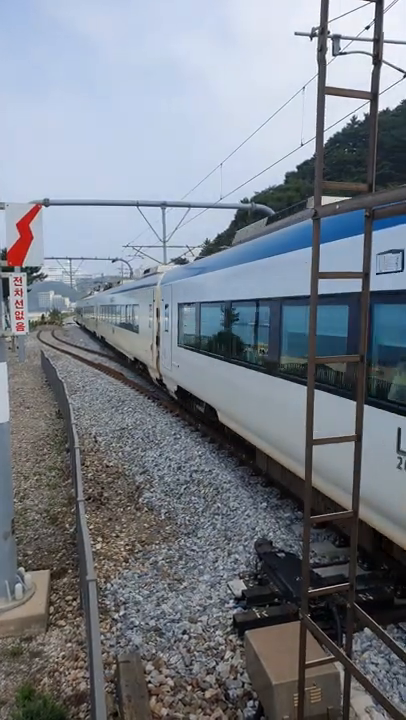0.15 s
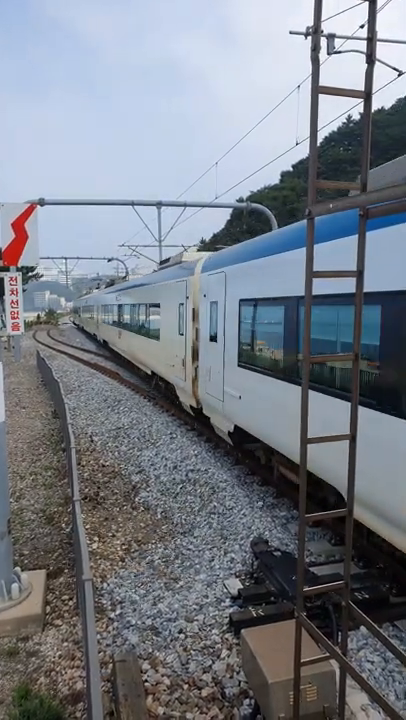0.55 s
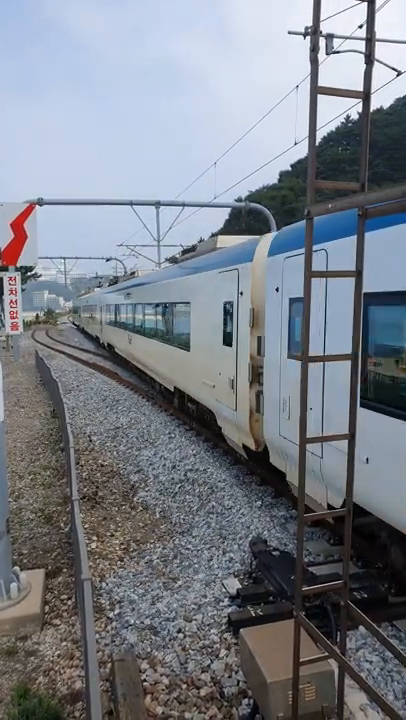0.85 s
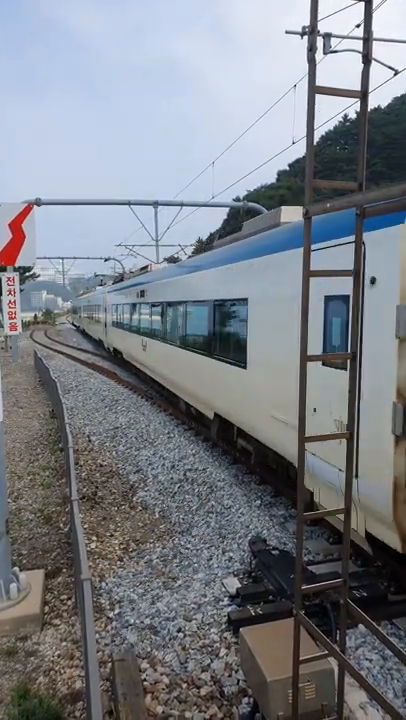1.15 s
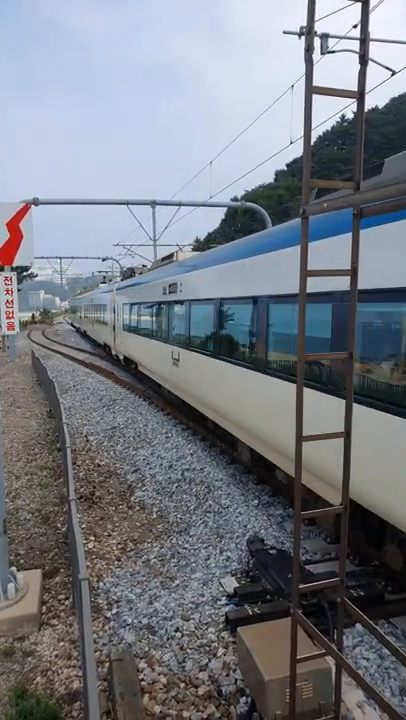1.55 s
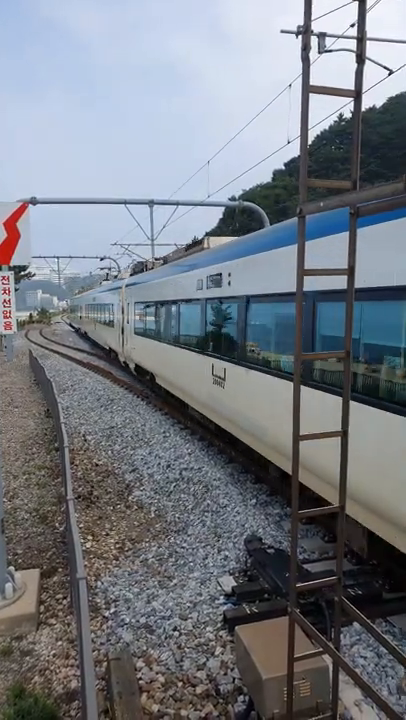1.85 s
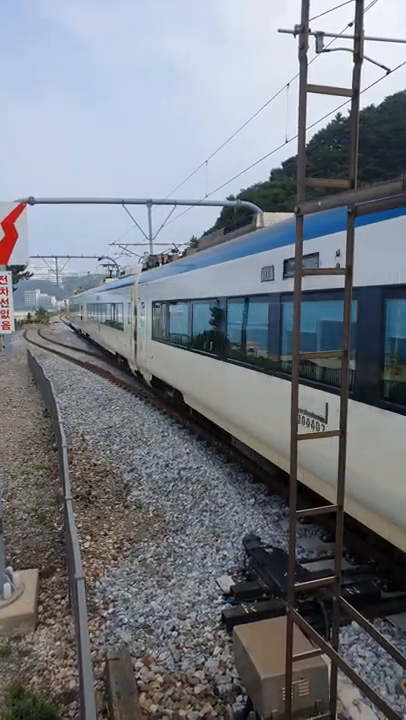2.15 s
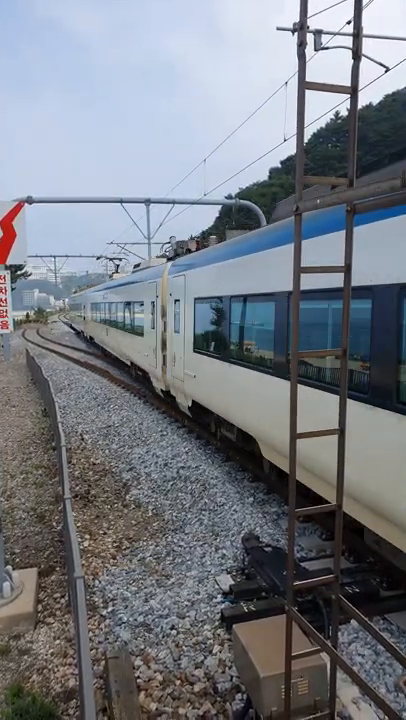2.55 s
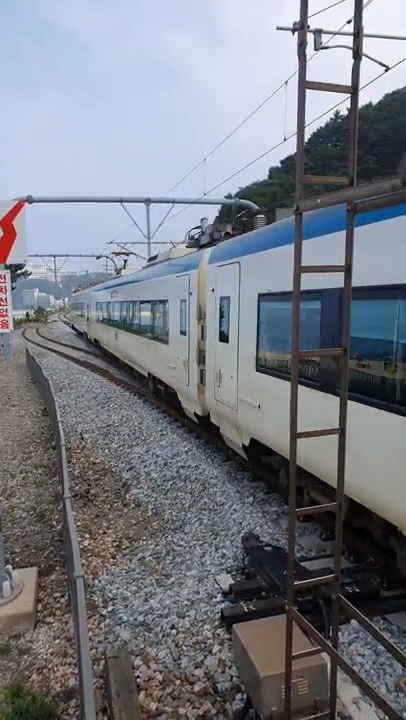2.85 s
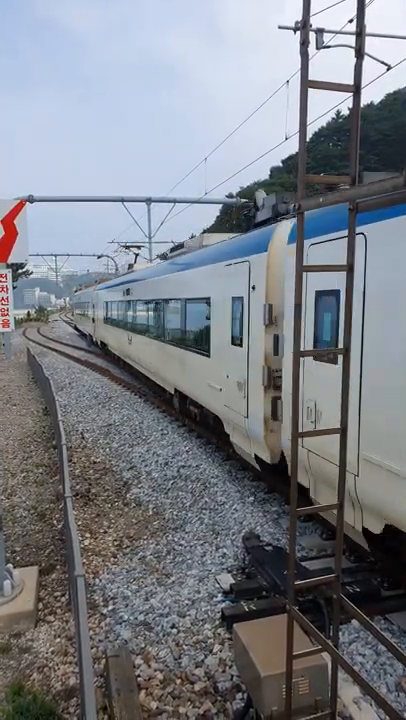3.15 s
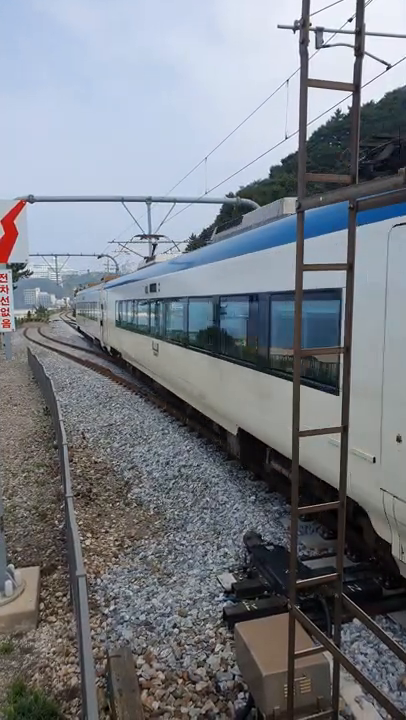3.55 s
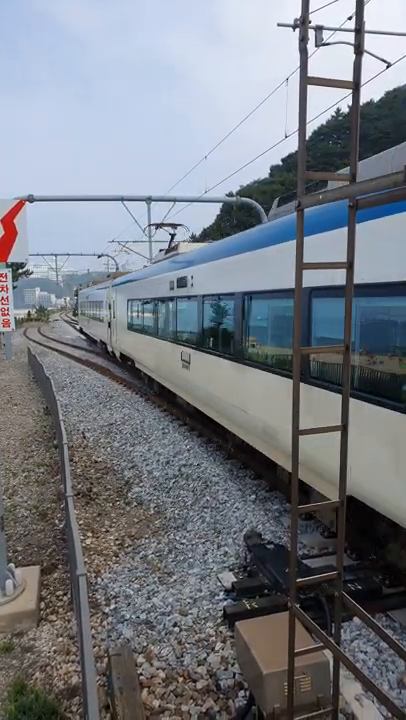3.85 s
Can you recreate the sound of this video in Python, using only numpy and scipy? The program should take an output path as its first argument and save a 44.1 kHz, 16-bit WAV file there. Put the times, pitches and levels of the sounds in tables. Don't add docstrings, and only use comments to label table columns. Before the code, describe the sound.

Close trackside view of a passing train: soft rolling hum swells into heavy clunks over rail joints, eases briefly, then returns with sharp clanking, hissing wheel strikes and scraping that ring away.

```python
import sys
import numpy as np
from scipy import signal
from scipy.fft import rfft, irfft
from scipy.io import wavfile

SR = 44100
rng = np.random.default_rng(int(sys.argv[2]) if len(sys.argv) > 2 else 0)


def wav_out(sig):
    wavfile.write(sys.argv[1], SR, np.round(np.clip(np.atleast_2d(sig).T, -1, 1) * 32767).astype(np.int16))


def natural_amplitude(level_db):
    exponent = np.asarray(level_db, float) / 20
    return 10 ** exponent


N = 176400
HZ = np.fft.rfftfreq(N, 1 / SR)
T = np.arange(N) / SR
HIT_N = 8192
LEFT_LAG_S = .00022

# [t/s, sleeper hum level/dB, rail song level/dB, rail song f/Hz,
# flange grind level/dB, rim tone level/dB]
BOGIES = [(0, -40, -37.5, 480, -44, -66), (.44, -41, -34, 527, -48, -85),
          (.72, -29.5, -28.5, 508, -43.5, -44), (.85, -24.5, -24, 512, -39, -44),
          (1.04, -19.5, -21, 561, -34, -42), (1.16, -21.5, -30, 558, -35, -37),
          (1.53, -20.5, -24.5, 517, -37.5, -40.5), (1.77, -22.5, -32, 552, -43, -39),
          (1.98, -27, -26, 484, -44, -40.5), (2.19, -33, -35.5, 492, -43.5, -44),
          (2.52, -35, -39.5, 502, -44.5, -50), (2.72, -24.5, -28.5, 502, -43.5, -47.5),
          (2.88, -23.5, -27.5, 505, -41, -40.5), (3.06, -22, -20.5, 535, -38.5, -43),
          (3.25, -24, -38.5, 534, -46.5, -44.5), (3.6, -22, -25, 508, -42, -41),
          (4, -25.5, -44.5, 520, -41, -43.5)]
# [t/s, peak level/dB, knock f/Hz, rattle level over the thump/dB]
AXLES = [(0.237, -13, 173, -18), (0.46, -11.5, 203, -10), (0.882, -13, 175, -33), (0.912, -2.5, 253, -14),
         (1.089, -6.5, 195, -10), (1.111, -0.5, 196.4, -13.5), (1.138, -4, 234, -13), (1.239, -8, 208, -26),
         (1.34, 1.5, 470.4, -17), (1.557, -8, 227, -40), (1.608, -2, 175, -12.5), (1.81, -17.5, 178, 4),
         (1.847, -10.5, 208, -3.5), (1.906, -6, 173, -7.5), (2.049, -8, 432, -7), (2.386, -7.5, 281, -14),
         (2.598, -12.5, 194, -12), (2.628, -8.5, 292, -8), (2.88, -13, 495, -22), (3.137, -7.5, 333, -5),
         (3.35, -13.5, 257, -3.5), (3.383, -9, 322, -7.5), (3.592, -8, 465, -10.5), (3.838, -14, 221, -38),
         (3.896, -3.5, 233, -14), (3.967, -12, 187, -8)]
# [t/s, peak level/dB, f/Hz]
RAIL_PINGS = [(0.583, -17, 486), (0.657, -10, 488), (0.763, -30, 510), (0.861, -8.5, 500),
              (0.891, -5.5, 546), (0.974, -15, 523), (1.176, -6.5, 503), (1.249, -10, 440),
              (1.342, 0.5, 465), (1.495, -12, 475), (1.56, 1, 475.5), (1.66, -9, 581), (1.996, -22, 480),
              (2.05, -19, 413), (2.601, -13.5, 525), (2.752, -13, 476), (2.835, -7, 473),
              (2.884, -7.5, 509), (2.988, -13.5, 524), (3.098, -2, 464), (3.212, -11, 553),
              (3.504, -13, 502), (3.596, -19, 439), (3.85, -5.5, 458), (3.903, -6, 543)]
# [t/s, peak level/dB, f/Hz, length/s]
SLEEPER_BOOMS = [(0.236, -24, 184, 0.043), (0.456, -16.5, 194, 0.087), (0.923, -8.5, 289, 0.032),
                 (1.011, -22, 157, 0.044), (1.093, -5, 175, 0.038), (1.135, -2.5, 288, 0.034),
                 (1.181, -15, 268, 0.05), (1.238, -14, 203, 0.043), (1.281, -12, 241, 0.042),
                 (1.586, -14, 248, 0.033), (1.803, -20, 183, 0.04), (1.907, -8, 175, 0.061),
                 (2.39, -7.5, 160.4, 0.061), (2.631, -4.5, 168, 0.058), (3.149, -2.5, 169, 0.035),
                 (3.368, -5.5, 270, 0.043), (3.618, -11.5, 240, 0.029), (3.838, -7.5, 207, 0.061),
                 (3.883, -3, 207, 0.061), (3.964, -19, 188, 0.035)]
# [t/s, ring level/dB, clatter level/dB, rise/s, clatter t60/s]
FLANGE_STRIKES = [
    (.265, -55, -63, .01, 0.18),
    (0.976, -40, -27.5, 0.0077, 0.11),
    (1.596, -22, -36, .003, 0.23),
    (1.603, -39, -25, 0.0013, 0.067),
    (3.02, -26.5, -19, 0.0011, 0.11),
    (3.047, -21.5, -19.5, 0.0085, 0.47),
    (3.119, -22.5, -40, 0.002, 0.12),
    (3.352, -38.5, -35.5, .004, 0.26),
    (3.951, -45, -37, 0.011, 0.13),
]
# [t/s, level/dB]
BODY_LEVEL = [(0, -39), (.5, -40), (1.05, -28), (2.2, -28), (2.55, -33), (2.9, -32), (4, -29.5)]

# [f/Hz, width/Hz, level/dB]
RAIL_MODES = [(175, 138, -2), (225, 215, -3.5), (344, 66, -4), (707, 220, -21), (1380, 130, -24)]
# [f/Hz, level/dB]
RAIL_BED = [(60, -40), (120, -42), (400, -11), (750, -21), (1600, -59.5)]
# [f/Hz, width/Hz, level/dB]
RIM_MODES = [(1267, 89, 4), (2066, 65, 7.5), (2700, 240, -2), (3520, 105, 3.5), (4385, 320, -1),
             (4820, 104, -3.5), (5307, 390, -4.5), (6260, 300, -5.5)]
# [f/Hz, width/Hz, level/dB]
STRUCK_RIM_MODES = [(2820, 120, -10), (3290, 150, -6), (3570, 160, -6), (3900, 200, -11), (4390, 130, 0),
                    (4790, 110, -2), (5350, 200, 0), (5640, 90, -7), (6430, 150, -4), (6800, 250, -9)]
# [f/Hz, width/Hz, level/dB]
WHEEL_MODES = [
    [(9600, 300, -10), (11600, 200, -1), (12260, 350, 6.5), (12900, 300, -2), (14400, 400, 8),
     (15500, 200, 0)],
    [(8600, 330, -1), (9820, 180, -7), (11060, 350, -0.5), (11930, 250, 3.5), (12700, 200, 2),
     (12800, 250, -7), (13800, 300, 1), (15100, 300, -7)],
]
# [f/Hz, level/dB]
WHEEL_SHEEN = [
    [(7000, -7), (8500, -16), (10200, -16), (11500, -5.5), (14700, -8), (16000, -1.5)],
    [(7000, -6.5), (9300, -48), (10400, -9.5), (11200, -12), (14000, -16), (16000, -17)],
]
# [f/Hz, level/dB]
CLATTER_COLOUR = [(1800, -28), (2400, -20), (2750, -5), (3300, -3), (5000, -1), (6800, -5), (7800, -24)]
# [f/Hz, level/dB]
GRIND_COLOUR = [(1250, 6.5), (2450, 0), (3200, -3.5), (4200, -9), (6800, -11), (9200, -25), (11500, -21.5),
                (16000, -31)]
# [f/Hz, width/Hz, level/dB]
ROAR_MODES = [(3360, 1100, 2), (11400, 1100, -15)]
# [f/Hz, level/dB]
RATTLE_COLOUR = [(500, -1), (900, -1), (1500, -8.5), (2500, -15), (6500, -22.5), (8000, -37.5)]
# [f/Hz, level/dB]
BODY_COLOUR = [(20, -67), (40, -2.5), (80, -0.5), (105, 2.5), (150, -13.5)]
# [f/Hz, width/Hz, level/dB]
FLOOR_MODES = [(83.8, 9.5, 8)]

# [f/Hz, coherence/1]
COHERENCE = [(60, .99), (400, .96), (800, .9), (1500, .7), (3000, .45), (8000, .3), (15000, .2)]
# [f/Hz, level/dB]
LEAN = [(240, 0.5), (950, -1.5), (3000, 0.5), (6000, -6), (12000, -4.5)]
# [f/Hz, level/dB]
STRIKE_LEAN = [(3000, -3), (6000, -8), (12000, -9.5)]


def read(points, hz):
    f, value = np.transpose(points)
    return np.interp(np.log(hz + 1), np.log(f + 1), value)


def humps(peaks, hz):
    return np.sqrt(sum(natural_amplitude(2 * db) / (1 + (2 * (hz - f) / w) ** 2) ** 2 for f, w, db in peaks))


def noise(gain, lean):
    n = 2 * len(gain) - 2
    hz = np.fft.rfftfreq(n, 1 / SR)
    a, b = rfft(rng.standard_normal((2, n)), axis=1) * gain
    same = np.clip(read(COHERENCE, hz), 0, 1)
    side = natural_amplitude(read(lean, hz) / 2)
    left = a * side * np.exp(-2j * np.pi * hz * LEFT_LAG_S)
    right = (same * a + np.sqrt(1 - same ** 2) * b) / side
    x = irfft([left, right], axis=1)
    return x / x.mean(0).std()


def flicker(per_s, depth_db):
    x = irfft(rfft(rng.standard_normal(N)) / (1 + (HZ / per_s) ** 2), N)
    return natural_amplitude(depth_db * x / x.std())


def glide(x, hz, width):
    turn = np.exp(2j * np.pi * np.cumsum(hz) / SR)
    r = np.exp(-np.pi * width / SR)
    x = 2 * (turn * signal.lfilter([1.], [1, -2 * r, r * r], x / turn, axis=1)).real
    return x / x.mean(0).std()


def blow(s, rise, t60):
    t = np.maximum(T - s, 0)
    return np.minimum(t / abs(rise), 1) * natural_amplitude(-60 * t / t60)


def hit_times():
    t = np.arange(HIT_N) / SR
    return t, np.maximum(t - np.array([[LEFT_LAG_S], [0]]), 0)


def course(column):
    table = np.transpose(BOGIES)
    return np.interp(T, table[0], table[column])


def sleeper_hum():
    colour = np.hypot(humps(RAIL_MODES, HZ), natural_amplitude(read(RAIL_BED, HZ)))
    return noise(colour, LEAN) * flicker(per_s=8.3, depth_db=3.0) * natural_amplitude(course(1))


def rail_song():
    sing_hz = course(3)
    song = 0
    for ratio in (.92, 1.12):
        mode = glide(noise(np.ones(len(HZ)), LEAN), ratio * sing_hz, width=70)
        song = song + mode * flicker(per_s=6.3, depth_db=5.0) * 0.49
    return song * natural_amplitude(course(2) - 0.5)


def axle_joints():
    out = np.zeros((2, N + HIT_N))
    hz = np.fft.rfftfreq(HIT_N, 1 / SR)
    t, late = hit_times()
    rise = np.minimum(late / 0.008, 1)
    for s, peak_db, pitch_hz, rattle_db in AXLES:
        extra = humps([(520, 200, -3), (700, 160, -7), (pitch_hz, 110, 0)], hz)
        colour = np.sqrt(humps(RAIL_MODES, hz) ** 2 + extra ** 2)
        thump = noise(colour, LEAN) * rise * natural_amplitude(-11.5 - 60 * t / 0.28)
        partials = ((pitch_hz, 1), (1.43 * pitch_hz, .45), (640, .45))
        knock = sum(g * np.sin(2 * np.pi * (f * late + rng.random())) for f, g in partials)
        knock = knock * rise * natural_amplitude(-4 - 60 * t / 0.11)
        rattle = noise(natural_amplitude(read(RATTLE_COLOUR, hz)), LEAN) * np.minimum(t / .008, 1)
        rattle = rattle * natural_amplitude(-6 + rattle_db - 60 * t / 0.18)
        fade = 1 - (t / t[-1]) ** 2
        out[:, round(s * SR):][:, :HIT_N] += natural_amplitude(peak_db) * fade * (thump + knock + rattle)
    return out[:, :N]


def rail_pings():
    out = np.zeros((2, N + HIT_N))
    t, late = hit_times()
    for s, peak_db, pitch_hz in RAIL_PINGS:
        shape = np.minimum(late / 0.0096, 1) * natural_amplitude(peak_db - 10 - 60 * t / 0.24)
        out[:, round(s * SR):][:, :HIT_N] += shape * np.sin(2 * np.pi * pitch_hz * late)
    return out[:, :N]


def sleeper_booms():
    out = np.zeros((2, N + HIT_N))
    t, late = hit_times()
    for s, peak_db, pitch_hz, length in SLEEPER_BOOMS:
        stop = 1 + np.exp((t - length) / 0.013)
        shape = np.minimum(late / 0.0073, 1) / stop * natural_amplitude(peak_db - 11)
        out[:, round(s * SR):][:, :HIT_N] += shape * np.sin(2 * np.pi * pitch_hz * late)
    return out[:, :N]


def flange_strikes():
    out = np.zeros((2, N))
    for wheel in range(2):
        ring, clatter, linger = np.zeros((3, N))
        for s, ring_db, clatter_db, rise, clatter_t60 in FLANGE_STRIKES:
            if (s > 2.8) == wheel:
                t60 = 1.09 if ring_db > -40 else .12
                flash = natural_amplitude(-0.5) * blow(s, rise, 0.045)
                ring += (natural_amplitude(ring_db) * (blow(s, rise, t60) + flash)) ** 2
                clatter += (natural_amplitude(clatter_db) * blow(s, rise, clatter_t60)) ** 2
                linger += (natural_amplitude(clatter_db - 6.5) * blow(s, rise, t60)) ** 2
        sheen = natural_amplitude(read(WHEEL_SHEEN[wheel], HZ)) / (1 + (7500 / (HZ + 1)) ** 12)
        hiss = np.hypot(sheen, humps(WHEEL_MODES[wheel], HZ) / 2)
        out += noise(hiss, STRIKE_LEAN) * np.sqrt(ring)
        rim = humps(STRUCK_RIM_MODES, HZ) * natural_amplitude(8) if wheel else humps(RIM_MODES[4:], HZ)
        bed = natural_amplitude(read(CLATTER_COLOUR, HZ))
        rough = flicker(per_s=20, depth_db=1.5)
        out += noise(np.hypot(bed, rim / 2), STRIKE_LEAN) * np.sqrt(clatter) * rough
        out += noise(np.hypot(rim, bed / 2), STRIKE_LEAN) * np.sqrt(linger)
    return out


def flange_grind():
    grind_db = course(4)
    colour = natural_amplitude(read(GRIND_COLOUR, HZ)) / (1 + (600 / (HZ + 1)) ** 4)
    grind = noise(colour, LEAN) * flicker(per_s=10.6, depth_db=2.25)
    roar = noise(humps(ROAR_MODES, HZ), LEAN) * natural_amplitude(grind_db + 30.5)
    return (grind + roar) * natural_amplitude(grind_db + 3.5)


def rim_tones():
    pulse = natural_amplitude(0.4 * np.sin(2 * np.pi * 4.2 * T))
    return noise(humps(RIM_MODES, HZ), STRIKE_LEAN) * pulse * natural_amplitude(course(5))


def body_rumble():
    rumble = natural_amplitude(read(BODY_COLOUR, HZ)) / (1 + (HZ / 170) ** 6)
    level_db = np.interp(T, *np.transpose(BODY_LEVEL))
    return noise(np.hypot(rumble, humps(FLOOR_MODES, HZ)), LEAN) * natural_amplitude(level_db)


def scene():
    wheels_and_rail = sleeper_hum() + rail_song() + axle_joints() + rail_pings() + sleeper_booms()
    return wheels_and_rail + flange_strikes() + flange_grind() + rim_tones() + body_rumble()


def top_cut(x):
    return signal.sosfilt(signal.butter(12, 16470, fs=SR, output="sos"), x)


def record(dry):
    limited = np.tanh(dry * 0.91) / 0.83
    dip = 1 - .86 / (1 + (2 * (HZ - 7950) / 900) ** 4)
    band = (HZ < 15760) / (1 + (33 / (HZ + 1)) ** 4)
    mix = irfft(rfft(limited, axis=1) * dip * band, N, axis=1)
    return top_cut(mix)


dry = scene()
out = record(dry)
wav_out(out)
```